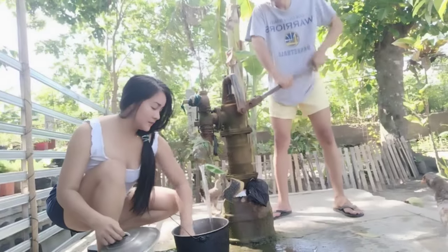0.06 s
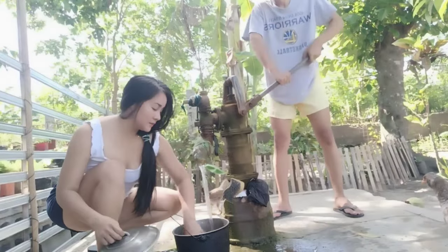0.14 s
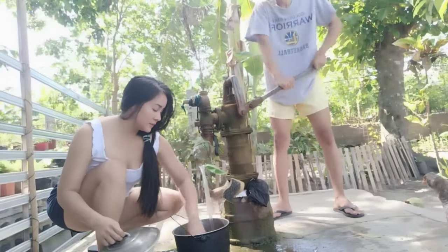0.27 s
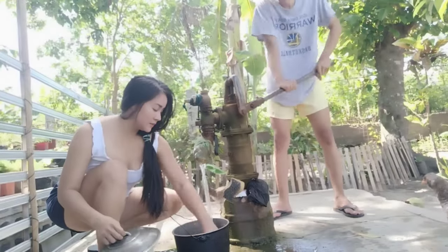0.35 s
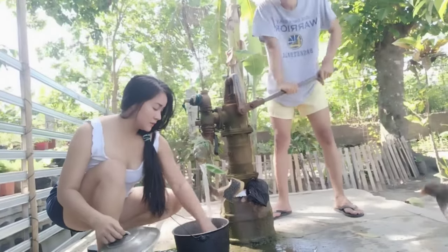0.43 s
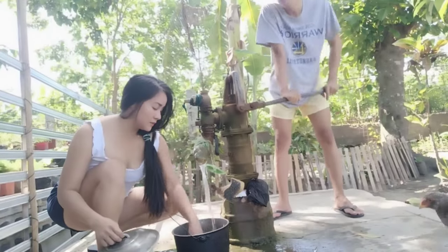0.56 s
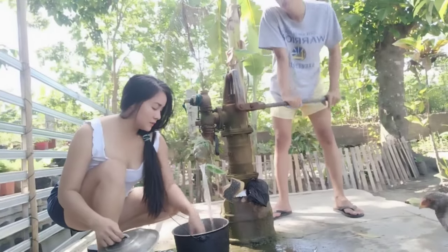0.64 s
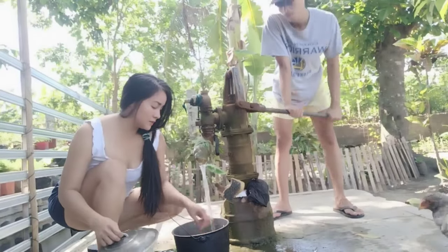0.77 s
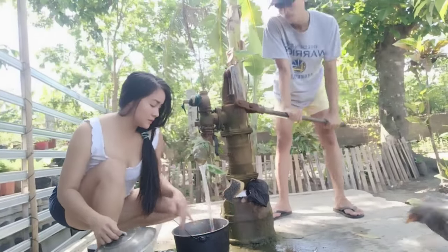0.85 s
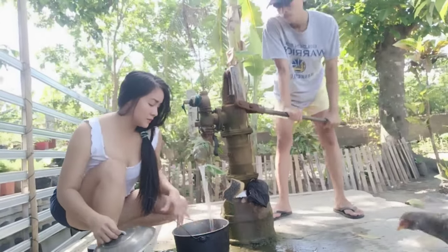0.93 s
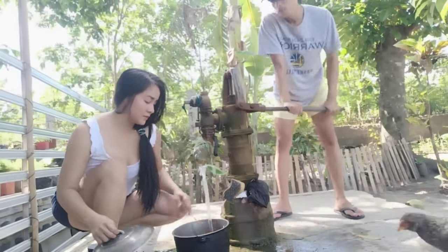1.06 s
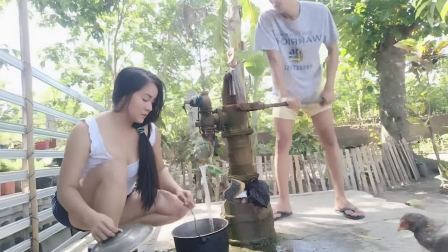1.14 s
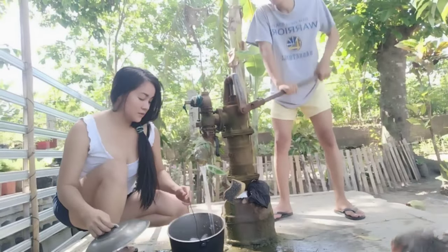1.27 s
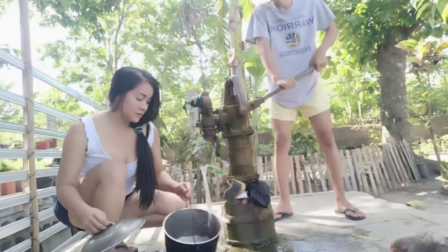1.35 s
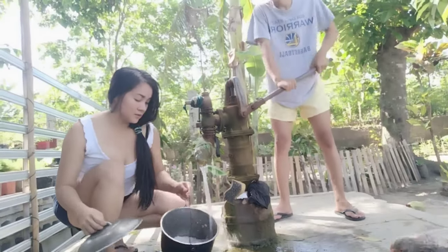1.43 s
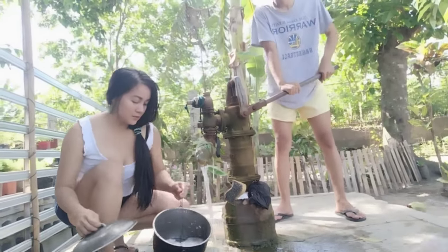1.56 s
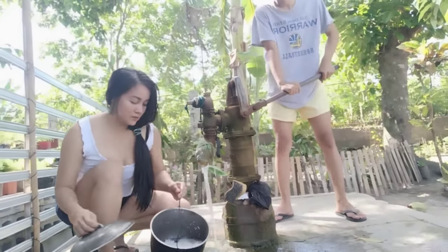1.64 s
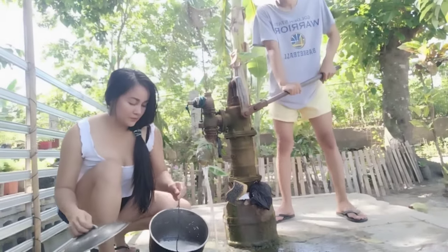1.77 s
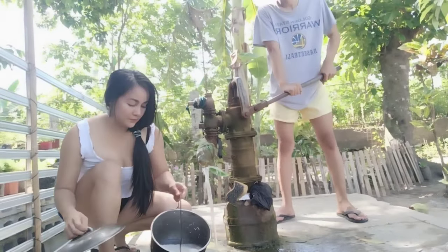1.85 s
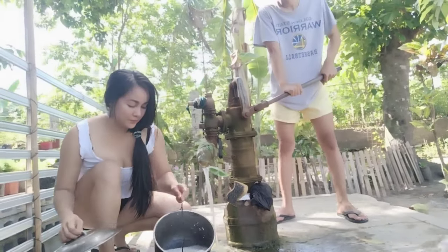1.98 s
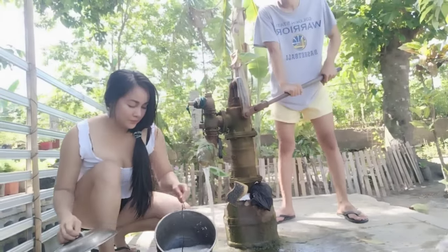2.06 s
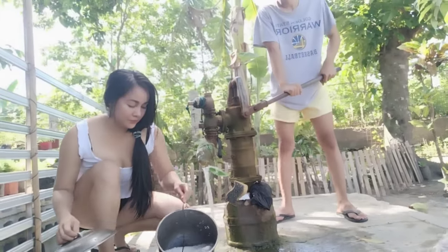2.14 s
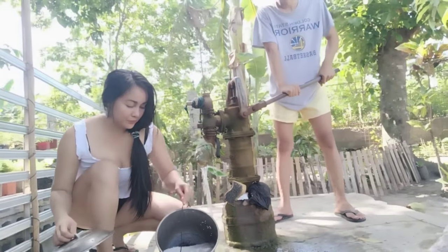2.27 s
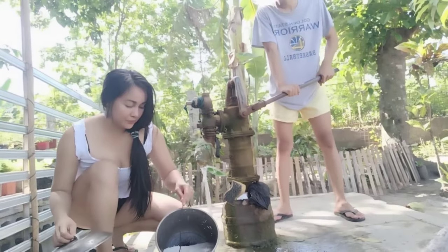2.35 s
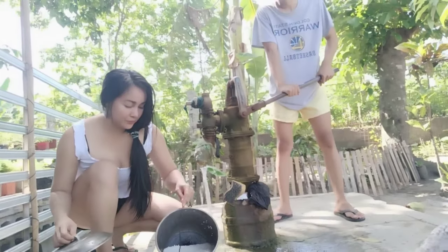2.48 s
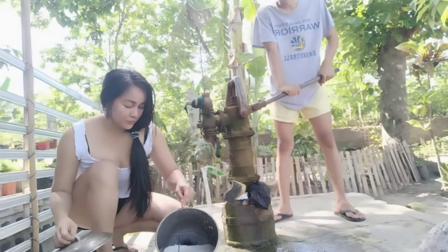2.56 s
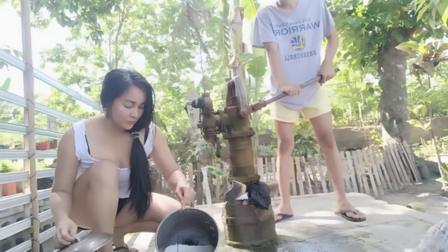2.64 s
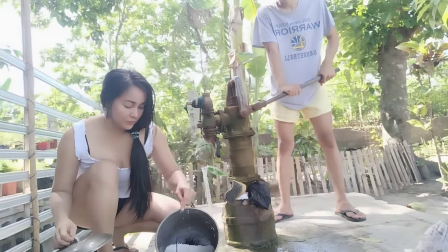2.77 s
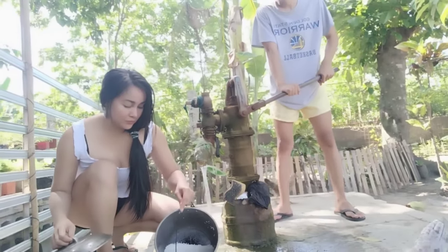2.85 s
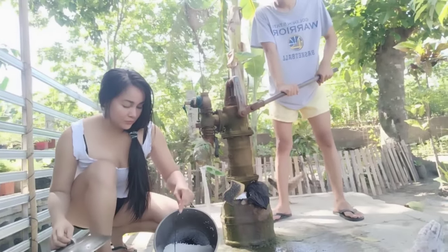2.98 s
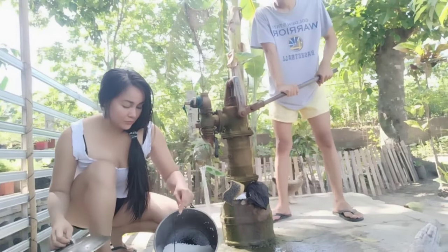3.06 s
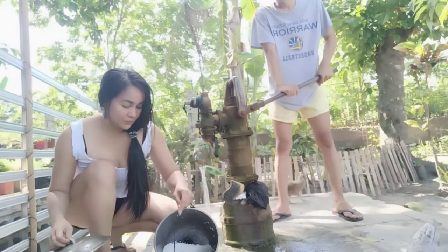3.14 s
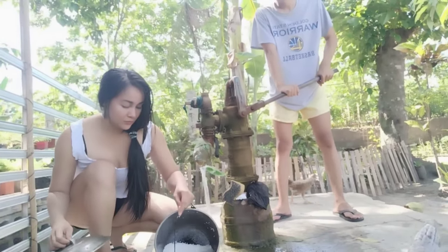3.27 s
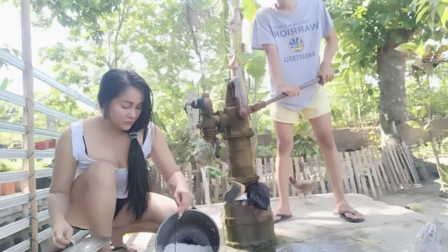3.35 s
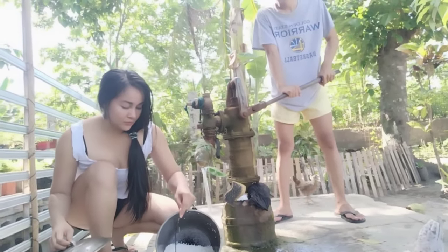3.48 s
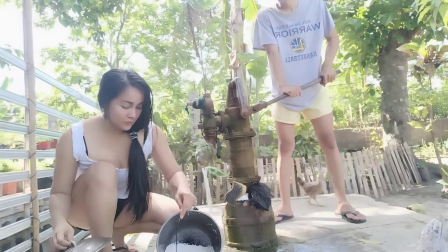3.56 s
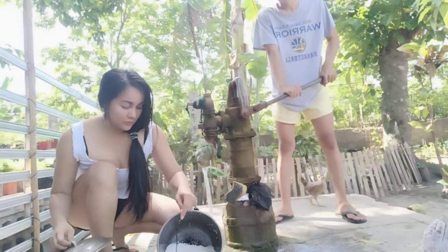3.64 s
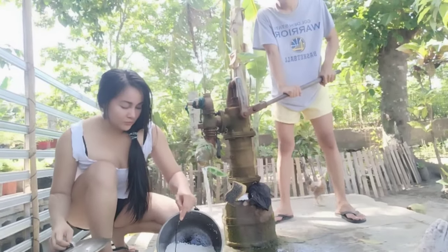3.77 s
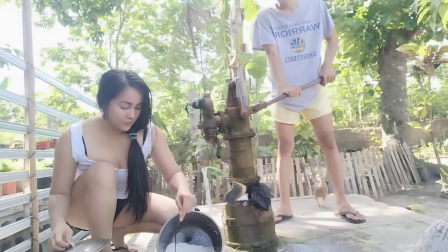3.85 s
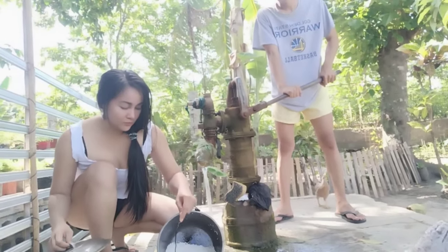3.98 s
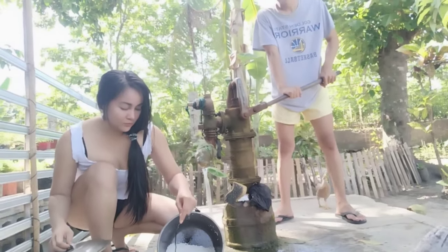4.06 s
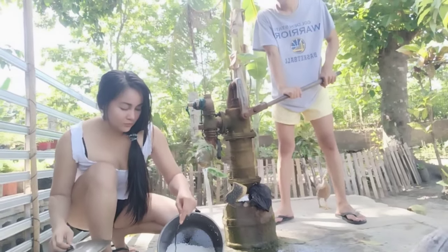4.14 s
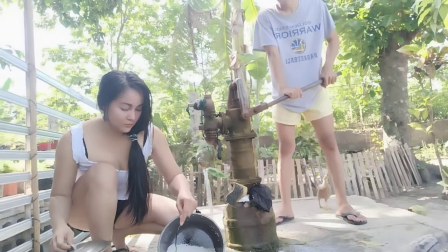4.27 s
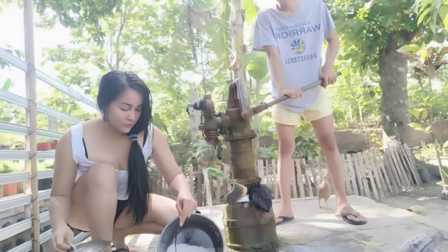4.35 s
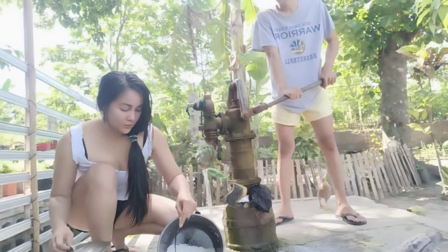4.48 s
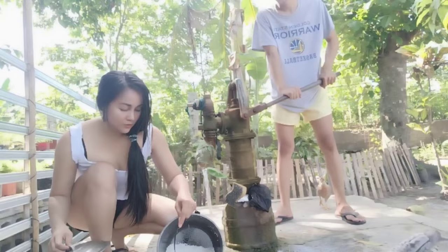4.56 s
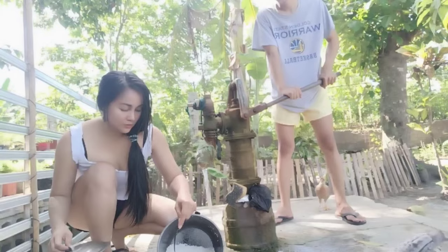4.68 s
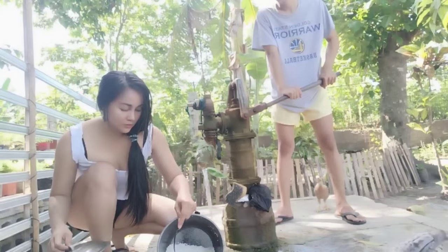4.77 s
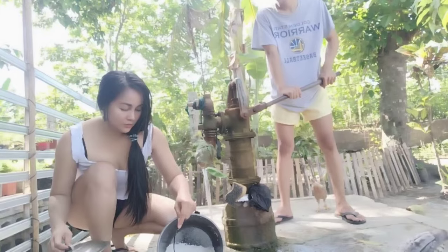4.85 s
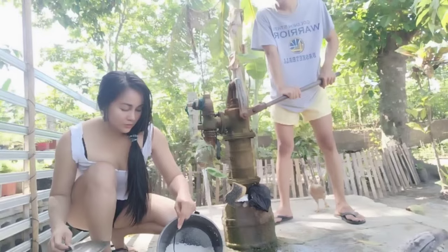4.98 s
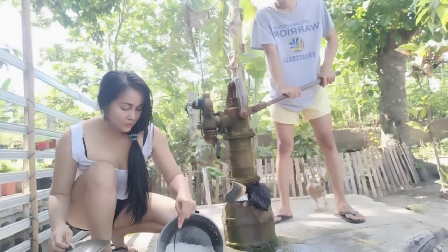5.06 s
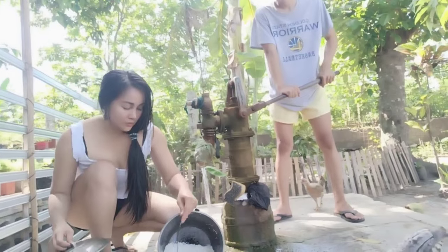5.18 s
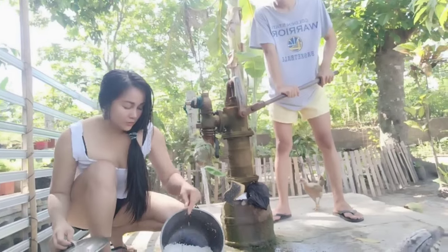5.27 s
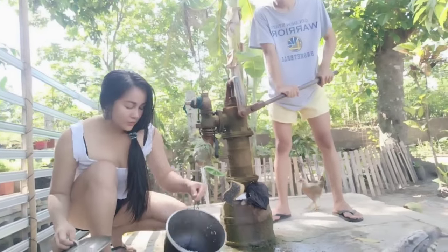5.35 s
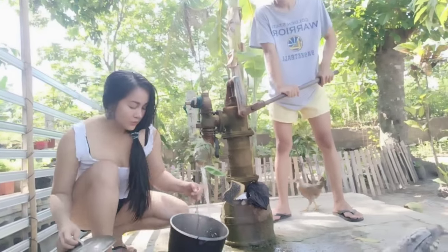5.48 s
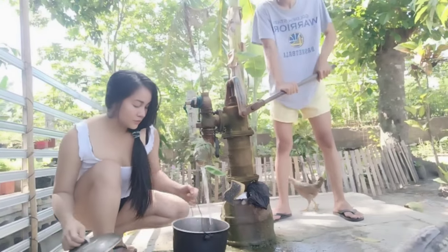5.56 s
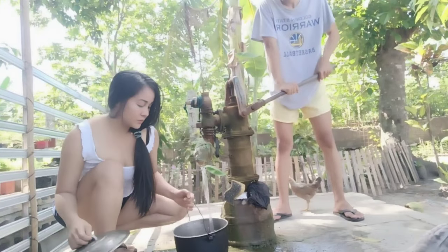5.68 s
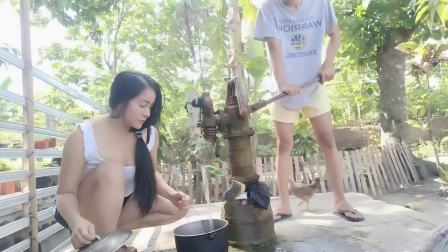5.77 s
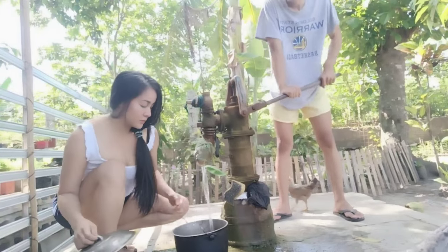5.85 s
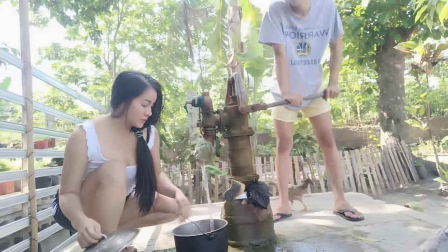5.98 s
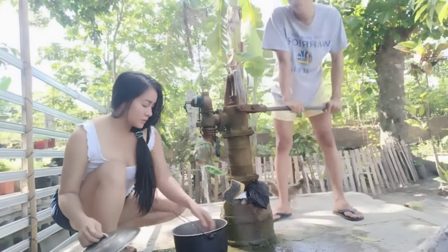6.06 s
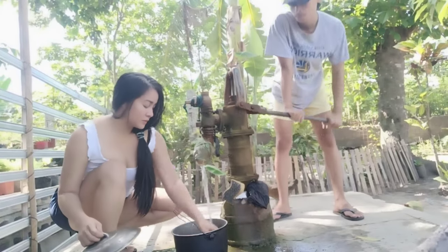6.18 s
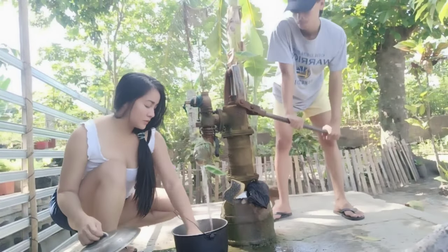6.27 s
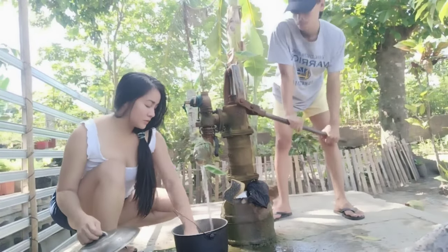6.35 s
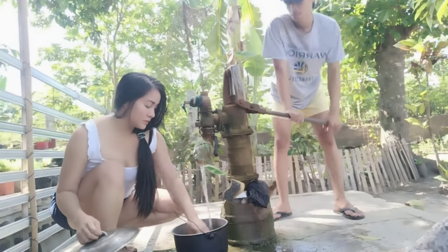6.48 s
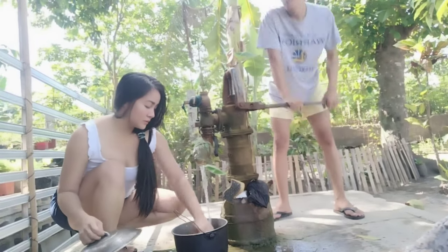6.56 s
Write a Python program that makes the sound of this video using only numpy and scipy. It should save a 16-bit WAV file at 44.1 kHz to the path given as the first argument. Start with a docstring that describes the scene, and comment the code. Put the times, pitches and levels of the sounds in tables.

```python
"""A cast-iron hand pump in a farmyard, over leaf hiss and a low rumble with thumps.
First the dry pivot squeals by sticking and slipping, the rod clanks, and water gushes into a pot.
Then the pot is tipped: water trickles, drips and gurgles as drops crack and air pockets ring; chicks peep softly.
Last the pot is set down with a bounce, and pumping starts again with new squeals and a fresh gush.
Two microphone ports hear it with different colour and a small lag."""
import sys
import numpy as np
from scipy import signal
from scipy.fft import rfft, irfft, next_fast_len
from scipy.io import wavfile

SR = 44100
rng = np.random.default_rng(int(sys.argv[2]) if len(sys.argv) > 2 else 0)


def unload_wav(signal):
    """Save mono or channel-first audio to the path in sys.argv[1] as 16-bit WAV at rate SR, clipped to [-1, 1]."""
    wavfile.write(
        sys.argv[1],
        SR,
        np.round(np.clip(np.atleast_2d(signal).T, -1, 1) * 32767).astype(np.int16),
    )


N = 291942   # length in samples

# how strongly the water falls and bubbles: t/s, splash level/dB, gurgle level/dB
WATER_FLOW = [(0.0, -42, -48.5), (0.57, -42.5, -43.5), (0.96, -43, -44.5), (1.29, -41, -49.5),
              (1.66, -53.5, -57), (2.73, -58, -63.5), (4.13, -61.5, -58.5), (5.42, -53.5, -61.5),
              (5.75, -37.5, -45), (6.19, -42, -45.5), (6.62, -35, -43)]


def amp(db):
    """Turns decibels into a plain multiplier."""
    return 10 ** (np.asarray(db) / 20)


def rms_one(x):
    """Scales a sound to an average strength (rms) of 1."""
    return x / np.sqrt(np.mean(x ** 2) + 1e-20)


def drift(rate_hz, size=N):
    """Slow random wandering of spread 1: noise passed twice through a one-pole low-pass."""
    r = np.exp(-2 * np.pi * rate_hz / SR)
    noise = rng.standard_normal(size + 9000)
    settled = signal.lfilter([1], [1, -2 * r, r * r], noise)[9000:]
    return rms_one(settled)


def ring(x, hz, t60):
    """A unit click sets a sine of height 1 ringing; it falls by 60 dB in t60 seconds."""
    r, w = amp(-60 / (t60 * SR)), 2 * np.pi * hz / SR
    return signal.lfilter([0, np.sin(w)], [1, -2 * r * np.cos(w), r * r], x + 1e-18)


def peak(x, hz, width_hz, db):
    """Bell-shaped boost or cut around one pitch."""
    w, a = 2 * np.pi * hz / SR, amp(db / 2)
    k = np.tan(np.pi * width_hz / SR)
    return signal.lfilter([1 + k * a, -2 * np.cos(w), 1 - k * a], [1 + k / a, -2 * np.cos(w), 1 - k / a], x)


def high_pass(x, hz):
    """Takes the bass out."""
    return signal.sosfilt(signal.butter(2, hz, "high", fs=SR, output="sos"), x)


def band_pass(x, order, low_hz, high_hz):
    """Keeps mainly the sound between two pitches."""
    return signal.sosfilt(signal.butter(order, [low_hz, high_hz], "band", fs=SR, output="sos"), x)


def coloured(x, points):
    """Shapes noise-like sound to a smooth spectrum; rms 1."""
    hz, db = np.transpose(points)
    size = next_fast_len(N)
    log_hz = np.log(np.arange(size // 2 + 1) * SR / size + 1)
    gain = amp(np.interp(log_hz, np.log(hz), db, left=-80, right=-80))
    return rms_one(irfft(rfft(x, size) * gain, size)[..., :N])


def grains(per_s, spread_db):
    """Random clicks with a long-tailed spread of sizes."""
    sizes = amp(spread_db * np.minimum(rng.exponential(1, N), 5)) * rng.choice([-1, 1], N)
    return sizes * (rng.random(N) < per_s / SR)


def add(out, s, sound, pan_db=0):
    """Mixes a short sound in at s seconds, panned so that the centre level stays."""
    i, lean = round(s * SR), amp(pan_db)
    gains = [2 * lean / (1 + lean), 2 / (1 + lean)]
    out[:, i:i + len(sound)] += np.outer(gains, sound[:N - i])


def tone(hz, db, rough):
    """A near sine whose pitch and strength shake with roughness; both ends are faded."""
    size = len(hz)
    shake = drift(270, size=size)
    phase = np.cumsum(2 * np.pi * hz * (1 + 0.02 * rough * shake) / SR)
    to_end = np.minimum(np.arange(size) + 40, np.arange(size)[::-1] + 40)   # samples to the nearer end, plus 40
    fade = np.minimum(1, to_end / 200)
    tremble_db = 6 * rough * drift(150, size=size)
    return np.sqrt(2) * amp(db + tremble_db) * np.sin(phase) * fade


def yard():
    """Leaf hiss of its own in each port over shared far noise, with a low rumble and thumps below."""
    # colour of the yard noise: f/Hz, relative level/dB
    hiss_colour = [(15, -67), (40, -45), (114, 0.5), (277, 8), (439, -6), (1020, -9.5), (1840, -9.5),
                   (2840, -10), (6050, -1.5), (7110, -11), (7920, -7), (14800, -22), (16000, 9)]
    # low rumble and thumps, strongest after the pot is set down: t/s, level/dB
    rumble_levels = [(0.0, -74), (0.2, -61), (4.76, -62.5), (4.85, -57.5), (5.49, -64), (5.73, -50),
                     (6.16, -64.5), (6.6, -54), (6.62, -64)]
    mid, side, rumble = rng.standard_normal((3, N))
    side = high_pass(side, 460)
    hiss_db = -51 + drift(7.2)
    hiss = amp(hiss_db) * coloured(np.array([mid + side, mid - side]), hiss_colour)
    rumble_db = np.interp(np.arange(N) / SR, *np.transpose(rumble_levels)) + 1.2 * drift(2.9)
    return hiss + amp(rumble_db) * rms_one(band_pass(rumble, 2, 48, 130))


def peeps():
    """Chicks give short falling whistles; rough ones smear into a cluster of neighbours."""
    # chick peeps: t/s, length/s, start f/Hz, end f/Hz, level/dB, roughness (0-1)
    chick_calls = [(2.116, 0.058, 3400, 2120, -43.5, 0.18), (2.678, 0.05, 5100, 4830, -37.5, 0.57),
                   (2.692, 0.084, 4100, 3460, -48, 0.77), (4.078, 0.056, 5000, 4300, -43.5, 0.64),
                   (4.094, 0.086, 3900, 3230, -46.5, .6), (3.482, 0.07, 3140, 1890, -54, 0.37),
                   (3.688, 0.12, 2690, 1880, -51, 0.4), (5.927, 0.062, 5500, 4320, -37, 0.55)]
    out = np.zeros((2, N))
    for s, length, start_hz, end_hz, db, rough in chick_calls:
        size = round(length * SR)
        fall = end_hz + (start_hz - end_hz) * np.linspace(1, 0, size) ** 1.3
        cluster = sum(share * tone(fall * (1 + step * rough), db, rough)
                      for share, step in ((1, 0), (rough, .12), (rough, -.1)))
        add(out, s, np.hanning(size) ** .5 * cluster, 4.0)
    return out


def bumps():
    """The full pot lands and bounces; every mode starts softly, within about a cycle."""
    # pot bottom landing on the slab: t/s, relative level/dB
    landings = [(5.571, -2.5), (5.612, -8.5), (5.65, -15.5), (5.676, -21)]
    # ringing modes of the pot: f/Hz, relative level/dB, t60/s
    pot_modes = [(417, -17, 0.17), (478, -1.5, 0.064), (752, -8, 0.027), (1040, -5, 0.014), (1544, -7, .02),
                 (3400, -24.5, 0.033)]
    out = np.zeros(N)
    times, landing_db = np.transpose(landings)
    for hz, level_db, t60 in pot_modes:
        clicks = np.zeros(N)
        uneven_db = rng.normal(0, 0.39, len(landings))
        clicks[[round(s * SR) for s in times]] = amp(landing_db + level_db + uneven_db)
        w = 2 * np.pi * hz / SR
        r = 1 - w / 4
        # a second, quickly fading resonance softens the start
        out += signal.lfilter([.5 * w], [1, -2 * r * np.cos(w), r ** 2], ring(clicks, hz, t60)) * np.sin(w)
    # grit crunches and water slops after each landing, driven by the last mode's clicks
    jolt = signal.lfilter([1], [1, -np.exp(-1 / (0.0096 * SR))], clicks)
    crunch = band_pass(jolt * rng.standard_normal((2, N)), 2, 500, 2300)
    return out + amp(21.0) * crunch


def cracks(table, cycles, crack_db):
    """Each drop or sharp hit is a crack of noise and a few brief rings around its pitch."""
    out, t = np.zeros((2, N)), np.arange(900) / SR
    for s, db, hz in table:
        ratios = (1, *rng.uniform(0.79, 1.6, 2))
        rings = sum(share * np.sin(2 * np.pi * hz * ratio * t) for share, ratio in zip((1, .55, .4), ratios))
        crack = amp(crack_db) * rng.standard_normal(900) * np.exp(-t / 0.0017)
        swell = 1 - np.exp(-t / .0006)
        add(out, s, amp(db) * swell * (rings * np.exp(-t * hz / cycles) + crack), rng.normal(0, 9.1))
    return out


def patter():
    """Small stray drops fall at random moments, following the splash."""
    s, splash_db = np.transpose(WATER_FLOW)[:2]
    draws = rng.random((420, 3))
    at = draws[:, 0] * N / SR
    base_db = np.minimum(np.interp(at, s, splash_db), -50)
    drop_db = base_db + 11.0 - 1.45 * np.log(draws[:, 1] + 0.025)
    return cracks(np.c_[at, drop_db, 2300 * 4.0 ** draws[:, 2]], cycles=20.2, crack_db=4)


def loud_hits():
    """Loud drops, the sharp ring of the hardest rod clanks, and fine droplets bursting higher up."""
    # loud drops on pot and slab, and the sharp ring of the hardest rod clanks: t/s, relative level/dB, f/Hz
    hits = [(0.1356, -32, 3260), (0.2992, -30, 3630), (0.4394, -26.5, 2590), (0.5395, -25.5, 2690),
            (0.6844, -25.5, 2560), (0.8216, -28, 3560), (0.961, -25, 2510), (1.103, -20, 2520),
            (1.3568, -43, 2860), (1.3678, -20.5, 2720), (1.3868, -28, 2340), (1.4099, -6.5, 5200),
            (1.5123, -25, 4900), (1.8924, -30, 3760), (1.9198, -32, 3800), (2.2062, -22, 5860),
            (2.3329, -23, 5280), (2.3633, -31, 3410), (2.5903, -33, 4560), (2.723, -23, 4100),
            (2.959, -27, 5900), (3.0303, -28, 3250), (3.6125, -25.5, 2620), (3.6968, -27.5, 5570),
            (3.8365, -16, 2840), (3.8704, -27, 5200), (4.1627, -33, 3640), (4.2695, -34.5, 2610),
            (4.3753, -31, 3270), (4.4271, -26, 2420), (4.5758, -35, 2480), (4.5948, -36, 2740),
            (4.7669, -32.5, 2640), (4.466, -20.5, 2824), (4.7973, -27.5, 3570), (4.8721, -25, 5920),
            (4.9958, -28, 2590), (5.1809, -24.5, 3350), (5.2852, -27, 2570), (5.3421, -27, 2910),
            (5.4797, -17, 5360), (5.6928, -25, 3290), (5.7128, -21.5, 3440), (5.7472, -24, 3060),
            (5.8959, -21, 2690), (5.9123, -19.5, 2810), (5.9827, -21, 3680), (6.0156, -21, 3090),
            (6.1443, -22.5, 4530), (6.3788, -26, 3800), (6.3987, -17.5, 2620), (6.421, -9, 5660),
            (6.497, -5.5, 6120)]
    # bursting fine droplets: t/s, relative level/dB, f/Hz
    droplets = [(0.9602, -22.5, 8780), (1.2655, -24.5, 10600), (1.2889, -25.5, 11700), (1.4087, -18, 8460),
                (1.5452, -31.5, 8000), (2.3628, -28, 7950), (2.4282, -26, 8070), (2.6013, -34, 7700),
                (3.5601, -34, 8300), (4.6816, -32, 7830), (4.9185, -28, 8500), (5.1804, -34.5, 11800),
                (5.2802, -26.5, 11100), (5.3575, -36, 7750), (5.4753, -34, 8900)]
    return cracks(hits, cycles=9.45, crack_db=-11) + cracks(droplets, cycles=35.0, crack_db=1)


def bubbles(table, cycles, rise):
    """An air pocket rings and rises in pitch as it nears the surface."""
    out, t = np.zeros((2, N)), np.arange(3000) / SR
    for s, db, hz in table:
        swell = (1 - np.exp(-t / .0025)) * amp(db) * np.exp(-t * hz / cycles)
        add(out, s, swell * np.sin(2 * np.pi * hz * t * (.96 + rise * t)), rng.normal(0, 1.4))
    return out


def glugs():
    """Each loud air pocket drags a few smaller ones of nearby pitch behind it."""
    # loudest air pockets: t/s, relative level/dB, f/Hz
    air_pockets = [(0.369, -29, 805), (0.422, -21, 930), (0.467, -21, 860), (0.494, -24, 920),
                   (0.568, -30, 1100), (0.595, -24, 1040), (0.621, -27, 983), (0.731, -22.5, 1050),
                   (0.985, -25.5, 790), (1.015, -30, 439), (1.098, -17.5, 1240), (1.115, -18.5, 1040),
                   (1.709, -32, 775), (1.756, -35.5, 836), (2.963, -36, 797), (3.143, -42.5, 452),
                   (3.576, -29, 1360), (3.744, -34.5, 1010), (3.826, -23, 1630), (4.005, -43.5, 680),
                   (4.165, -37, 1020), (4.23, -40, 574), (4.323, -32, 878), (4.423, -32.5, 1085),
                   (4.575, -37, 934), (4.656, -31.5, 830), (4.725, -35, 1315), (4.92, -24, 1040),
                   (5.287, -33.5, 1420), (5.093, -23.5, 1360), (5.149, -37, 920), (5.179, -39, 1090),
                   (5.485, -31.5, 1155), (5.75, -28, 1004), (5.872, -25.5, 923), (6.09, -27, 1010),
                   (6.143, -26, 1120), (6.224, -25, 997), (6.328, -28, 500), (6.379, -15.5, 1490),
                   (6.41, -24, 1310), (6.584, -25, 1040)]
    followers, follow_s, follow_loss_db = 3, .045, 7   # count, longest delay in s, least drop in dB
    lead = np.repeat(air_pockets, followers, axis=0)
    draws = rng.random((len(lead), 3))
    after_s = np.minimum(lead[:, 0] + follow_s * draws[:, 0], (N - 1) / SR)
    after_db = lead[:, 1] - follow_loss_db * (1 + draws[:, 1])
    after_hz = lead[:, 2] * (.65 + .9 * draws[:, 2])
    pockets = np.r_[air_pockets, np.c_[after_s, after_db, after_hz]]
    return bubbles(pockets, cycles=6.54, rise=3.86) * amp(2.0 * drift(120))


def splashing():
    """Water hits of many sizes are dealt at random to 24 short rings, shared unequally left and right."""
    # colour of the splash: f/Hz, relative level/dB
    splash_colour = [(1300, -9), (1900, -2), (2700, 2.5), (3050, -1.5), (3500, 2), (4500, -8), (6000, 8),
                     (7000, -16), (8000, 3), (9500, -43)]
    hits, dealt = grains(2500 * amp(4.9 * drift(12)), 2.94), rng.integers(0, 24, N)
    hz, db = np.transpose(splash_colour)
    rings = [amp(np.interp(f, hz, db)) * ring(hits * (dealt == k), f, 33.0 / f)
             for k, f in enumerate(np.geomspace(1300, 9500, 24))]
    even, odd = sum(rings[::2]), sum(rings[1::2])
    return rms_one(np.array([even + 0.34 * odd, odd + 0.34 * even]))


def gurgling():
    """A crowd of rising bubbles, with countless tiny pockets blurred into a wash of noise."""
    draws = rng.random((2200, 3))
    crowd = np.c_[draws[:, 0] * N / SR, -5.0 * np.log(draws[:, 1] + .01), 520 * 2.9 ** draws[:, 2]]
    gurgle = rms_one(bubbles(crowd, cycles=5, rise=1.2))
    wash = band_pass(rng.standard_normal((2, N)) + 2.0 * rng.standard_normal(N), 2, 330, 1400)
    return rms_one(gurgle + amp(3.0 + 4.7 * drift(53)) * rms_one(wash))


def water():
    """The stream makes splashes, gurgles below them and crackling spray above; it falls unevenly."""
    # colour of the spray: f/Hz, relative level/dB
    spray_colour = [(5000, 10), (8000, 4), (11000, 2), (13000, 9), (15000, -29), (16000, -24)]
    surge_db, surge_hz = 2.5, 9.5   # spread and rate of the uneven fall
    s, *levels = np.transpose(WATER_FLOW)
    splash_db, gurgle_db = (np.interp(np.arange(N) / SR, s, level) for level in levels)
    spray_db = -51.5 + 0.067 * (splash_db - splash_db.mean())   # follows a small share of the splash's swing
    spray = coloured(grains(5000 * amp(6 * drift(25)), 5), spray_colour)
    splash = amp(splash_db + surge_db * drift(surge_hz)) * splashing()
    gurgle = amp(gurgle_db + surge_db * drift(surge_hz)) * gurgling()
    return high_pass(splash + gurgle, 120) + amp(spray_db) * spray


def clanks():
    """Each blow is a dying rattle of contacts; loose parts split every mode and add a noisy clatter."""
    # rod hitting its stops: t/s, relative level/dB, rattle decay time/s
    blows = [(0.176, -20.5, 0.021), (0.186, -14, 0.011), (0.229, -26.5, 0.01), (0.499, -36.5, 0.011),
             (1.099, -32, 0.0075), (1.111, -29, 0.026), (1.4007, -18.5, 0.016), (1.4305, -23, 0.0098),
             (5.528, -35, 0.093), (5.867, -33, 0.018), (6.3736, -28.5, 0.032), (6.408, -21.5, 0.0079),
             (6.42, -23, 0.014), (6.445, -28.5, 0.03), (6.481, -29, 0.0083), (6.516, -38, 0.014)]
    # ringing modes of the iron: f/Hz, relative level/dB, t60/s
    iron_modes = [(1406, 1.5, 0.04), (1994, 11, 0.014), (2620, -9, 0.03), (3350, -2.5, 0.035),
                  (3570, -6, 0.042), (4530, 1, 0.084), (5463, 4, 0.032), (6010, -2, 0.071),
                  (6740, -1, 0.085), (7200, 2.5, 0.022), (8600, -14.5, 0.12), (9400, -13.5, 0.053),
                  (11100, -11, 0.08), (11400, -15.5, 0.023), (13100, -27, 0.036), (13700, -32, .05),
                  (14800, -15, 0.071)]
    rattle, t = np.zeros(N), np.arange(4000) / SR
    for s, db, length in blows:
        i = round(s * SR)
        fall = (1 - np.exp(-t / 0.0013)) * np.exp(-t / max(length, .001))
        rattle[i:i + 4000] += amp(db) * fall[:N - i]
    rattle *= amp(5.45 * drift(206))
    body = sum(amp(db - 32) * ring(rattle * rng.standard_normal(N), hz * split, t60)
               for hz, db, t60 in iron_modes for split in (1, 1.03))
    clatter = band_pass(rattle * rng.standard_normal(N), 1, 1200, 6500)
    return high_pass(body, 730) + amp(-2.5) * clatter


def squeak_rows(s, hz, db, rise, fall, glide):
    """A squeak rises, peaks and falls while its pitch glides evenly."""
    depth_db = 30   # how far the ends lie below the peak
    return [(s + dt, hz + glide * dt, db - (dt != 0) * depth_db) for dt in (-max(rise, .005), 0, max(fall, .005))]


def squeals():
    """Stick-slip in the pivot locks on to one high mode after another; the lower ones carry their octave."""
    # long squeals that swell with the push on the handle: roughness (0-1), rows of (t/s, f/Hz, level/dB)
    long_squeals = [ (0.34, [(0.0, 6710, -13.5), (0.04, 6700, -30), (0.073, 6730, -46), (0.17, 6710, -60)]),
                    (0.49, [(.345, 9200, -41), (.364, 8730, -28), (.396, 8560, -22.5), (.424, 8500, -37),
                    (.49, 8580, -51)]), (0.26, [(5.85, 9300, -40), (5.862, 8950, -33), (5.877, 8680, -19),
                    (5.98, 8600, -38), (6.03, 8600, -52)]), (0.078, [(0.49, 8560, -61),
                    (0.518, 8580, -21.5), (0.547, 8610, -12), (0.6, 8620, -26), (0.645, 8675, -11),
                    (0.681, 8670, -30), (0.745, 8620, -44)]), (0.1, [(1.11, 6710, -43), (1.145, 6780, -14),
                    (1.161, 6790, -11.5), (1.255, 6725, -25), (1.279, 6720, -46.5), (1.37, 6740, -51)]),
                    (0.068, [(5.88, 8130, -35), (5.911, 8060, -10.5), (5.93, 8040, -16.5),
                    (5.99, 8020, -16), (6.007, 7990, -25), (6.043, 8000, -12.5), (6.062, 7995, -27),
                    (6.094, 7990, -18), (6.2, 8050, -37)]), (0.15, [(6.045, 8480, -44),
                    (6.071, 8500, -10.5), (6.1, 8580, -14.5), (6.13, 8620, -9.5), (6.17, 8570, -14),
                    (6.22, 8560, -24), (6.27, 8580, -28), (6.4, 8590, -52)])]
    # short squeaks: t of peak/s, f/Hz, level/dB, rise/s, fall/s, glide/(Hz per s), roughness (0-1)
    short_squeaks = [(0.06, 3340, -40.5, 0.057, 0.13, -300, 0.02), (0.392, 15320, -29, .07, .09, -1000, .2),
                     (0.442, 8000, -37.5, 0.054, 0.046, 0, 0.2), (0.527, 15320, -19, 0.035, .125, -1500, 0),
                     (0.567, 9120, -17, .02, 0.1, 4000, 0.35), (0.632, 14350, -25, .12, 0.11, -200, 0.2),
                     (0.68, 10880, -23, 0.042, 0.17, -250, 0.5),
                     (0.683, 10330, -19.5, .021, 0.035, 1500, 0),
                     (0.731, 10330, -19, 0.019, 0.052, 1500, 0.26),
                     (0.748, 8500, -20.5, .02, 0.03, -4000, 0.6),
                     (0.759, 7770, -23, 0.013, 0.13, -400, .075),
                     (1.181, 10220, -36.5, 0.012, 0.1, -2500, 0.5),
                     (1.187, 3407, -28, .02, 0.18, -200, 0.2), (1.195, 3335, -31, .03, 0.19, -200, 0),
                     (1.315, 3350, -36, .12, 0.065, 0, 0), (0.05, 9800, -45, .03, 0.043, 0, .2),
                     (5.98, 10020, -40, 0.084, 0.18, 4, .15), (5.669, 6320, -24, 0.067, 0.05, -1000, 0.78),
                     (5.812, 13400, -45, 0.017, 0.42, -1800, .48),
                     (5.86, 15420, -16.5, 0.014, 0.11, -4500, 0.34),
                     (6.082, 15100, -36, 0.074, .2, -2000, 0.2), (6.19, 8490, -12, .028, 0.1, -200, 0.14),
                     (6.202, 10250, -18.5, 0.028, 0.078, -300, 0.06),
                     (6.259, 6620, -34, 0.099, .1, 1003, 0.75),
                     (6.521, 7030, -23, 0.088, 0.096, 2002, 0.52),
                     (6.598, 6990, -20, 0.027, 0.28, -5000, 0.48)]
    # where each pivot mode is heard: f/Hz, left minus right level/dB
    pivot_pan = [(3400, 10), (6720, 34), (7070, 5), (7790, -29), (8030, -38), (8600, -21), (10300, -14),
                 (10920, -7), (13400, 7), (15300, 27)]
    octave_db, octave_top_hz = -19, 15650   # the octave is left out from this pitch up
    out = np.zeros((2, N))
    for rough, rows in long_squeals + [(row[-1], squeak_rows(*row[:-1])) for row in short_squeaks]:
        s, hz, db = np.transpose(rows)
        t = np.arange(max(s[0], 0), s[-1], 1 / SR)
        loudest_hz = hz[np.argmax(db)]
        for times, gain_db in ((1, 0.0081), (2, octave_db)):
            if times == 1 or 2 * loudest_hz < octave_top_hz:
                pitch = times * np.interp(t, s, hz)
                sound = tone(pitch, gain_db + np.interp(t, s, db), np.clip(rough, 0, 1))
                add(out, t[0], sound, np.interp(times * loudest_hz, *np.transpose(pivot_pan)))
    return out


def ports(x):
    """The casing colours the two ports in opposite ways."""
    # colour of left over right: f/Hz, width/Hz, level difference/dB
    port_colour = [(4510, 6800, 11), (8600, 3680, -21.5), (15930, 1400, 35.5)]
    left, right = x
    for hz, width_hz, db in port_colour:
        left = peak(left, hz, width_hz, db / 2)
        right = peak(right, hz, width_hz, -db / 2)
    return np.array([left, right])


def echoes(x):
    """A few dull reflections from fence, slab and trees, other ones in each port."""
    out = np.zeros((2, N))
    lags = (rng.uniform(0.0018, 0.048, 16) * SR).astype(int)
    for k, lag in enumerate(lags):
        out[k % 2, lag:] += amp(-350 * lag / SR) * rng.choice([-1, 1]) * x[:-lag]   # later ones are weaker
    return signal.lfilter([.6], [1, -.4], out)


def scene():
    """Pump, water and chicks reach the left port a little late; the pot's bounce reaches both together."""
    left_lag = 13   # samples
    wet_and_hits = water() + high_pass(patter() + loud_hits() + glugs(), 350)
    near = ports(wet_and_hits + clanks()) + squeals() + peeps()
    near[0] = np.concatenate([np.zeros(left_lag), near[0, :-left_lag]])
    near += high_pass(high_pass(bumps(), 300), 300)
    reflected = amp(-9) * echoes(high_pass(near.mean(axis=0), 500))
    return near + reflected + high_pass(ports(yard()), 63)


def record(dry):
    """Peaks are rounded, then the top is cut steeply."""
    rounded = .9 * np.tanh(dry / .9)
    return signal.sosfilt(signal.cheby2(14, 70, 16250, fs=SR, output="sos"), rounded)   # 70 dB down from 16250 Hz


dry = scene()
out = record(dry)
unload_wav(out)
```